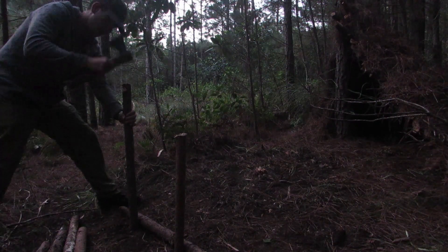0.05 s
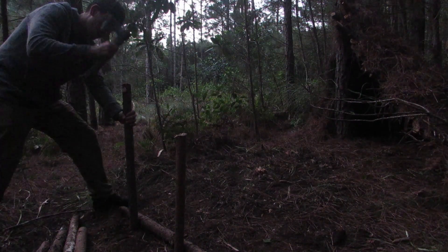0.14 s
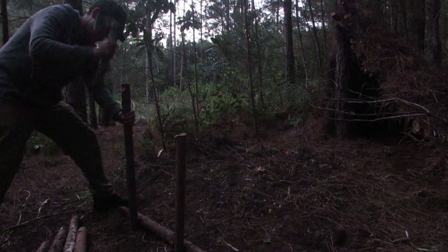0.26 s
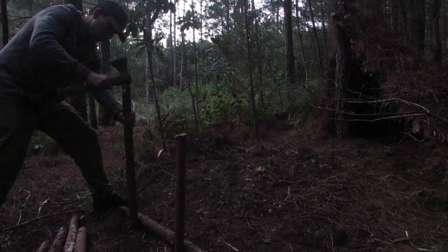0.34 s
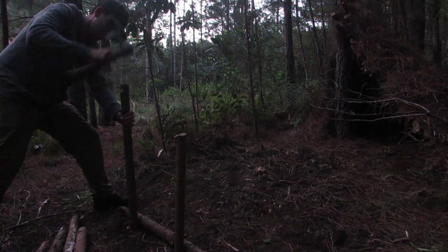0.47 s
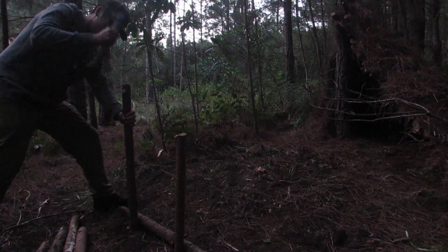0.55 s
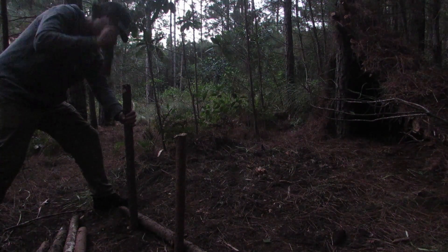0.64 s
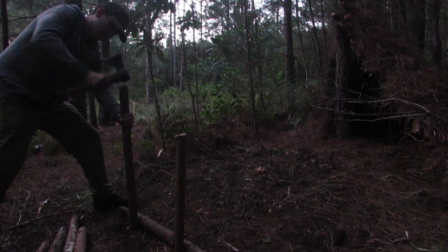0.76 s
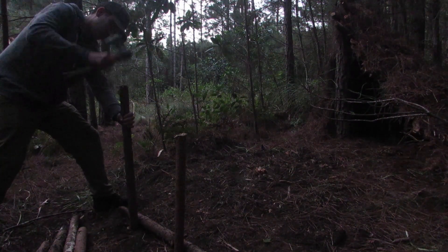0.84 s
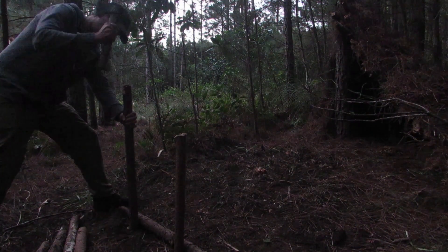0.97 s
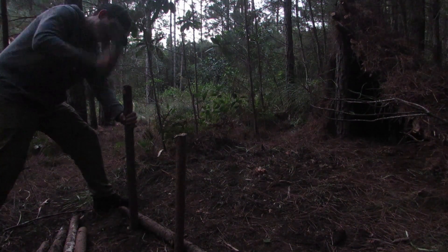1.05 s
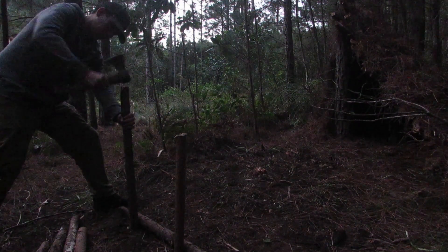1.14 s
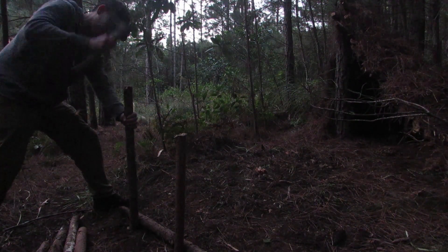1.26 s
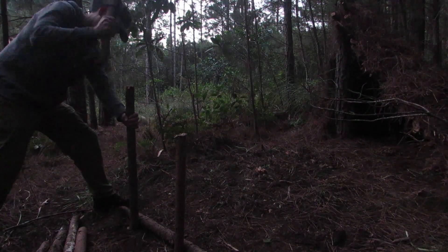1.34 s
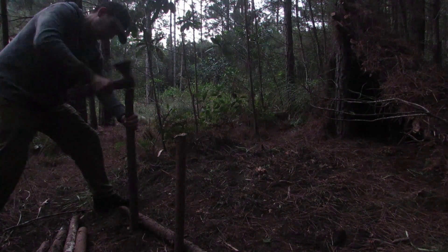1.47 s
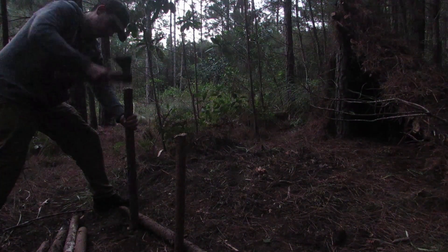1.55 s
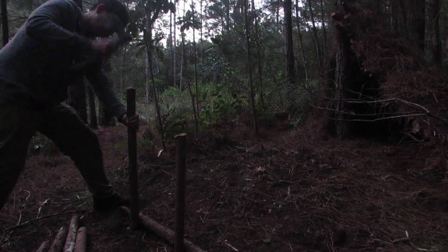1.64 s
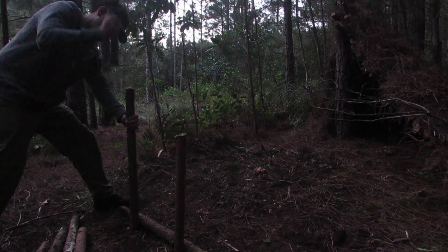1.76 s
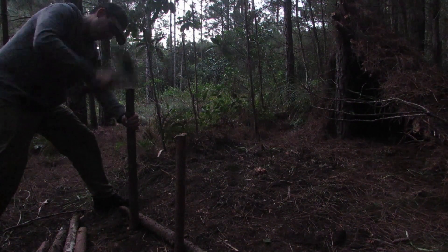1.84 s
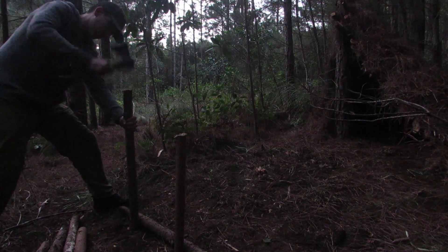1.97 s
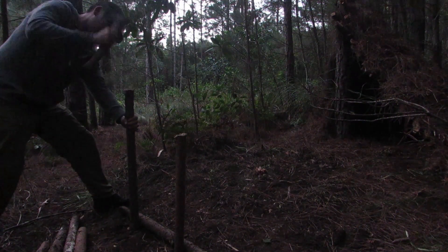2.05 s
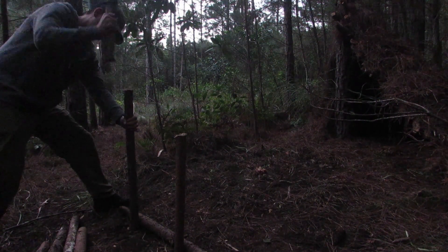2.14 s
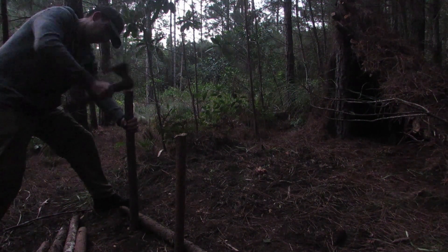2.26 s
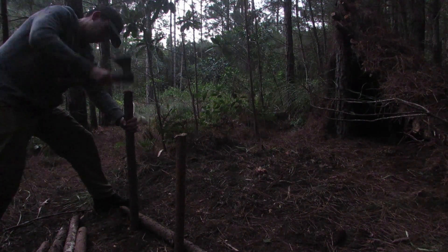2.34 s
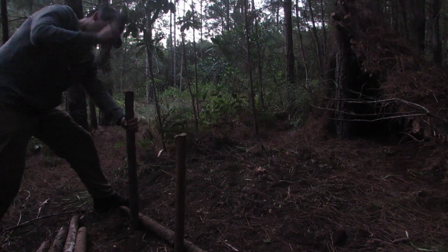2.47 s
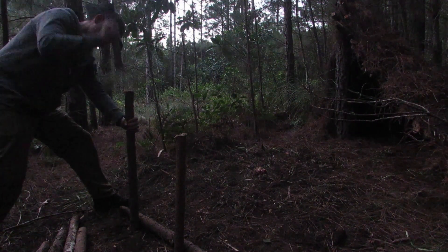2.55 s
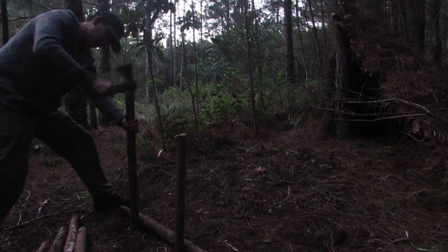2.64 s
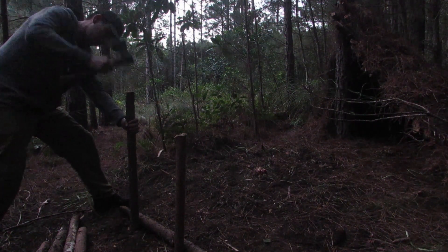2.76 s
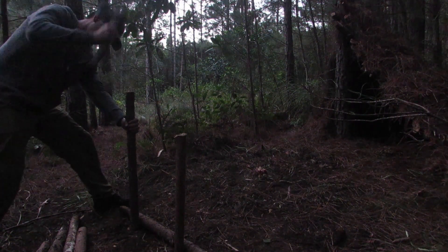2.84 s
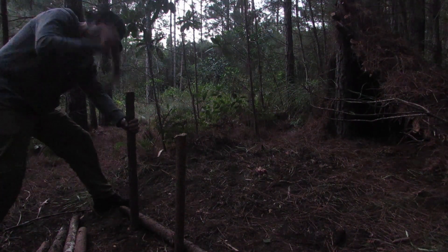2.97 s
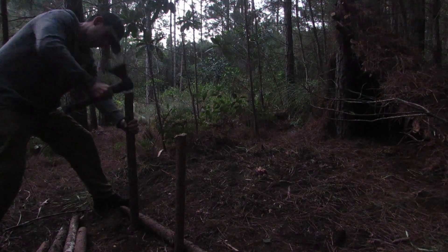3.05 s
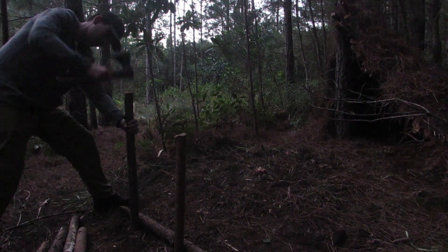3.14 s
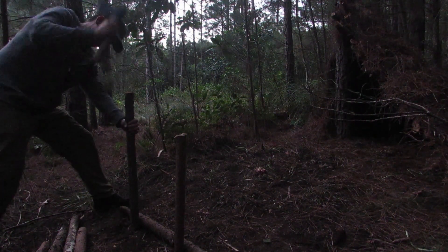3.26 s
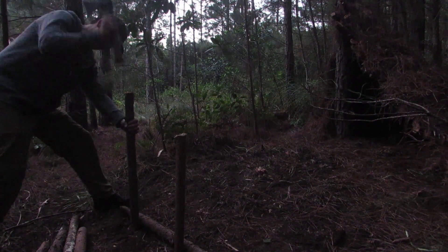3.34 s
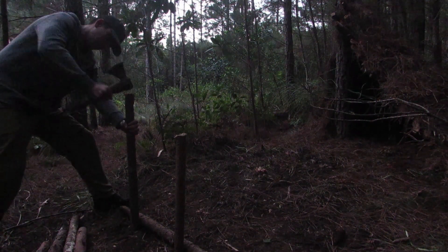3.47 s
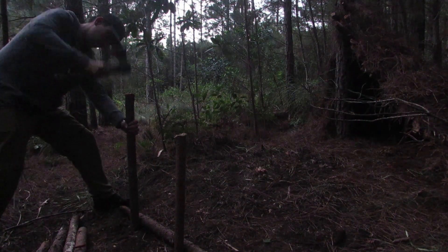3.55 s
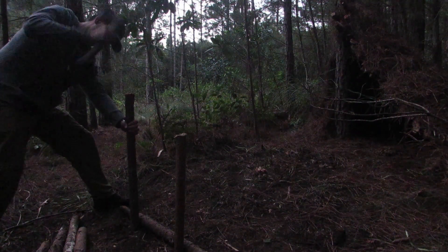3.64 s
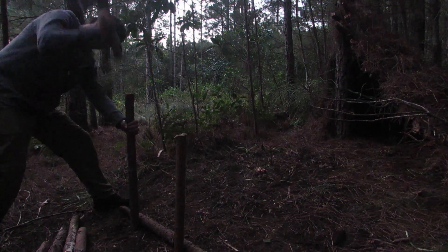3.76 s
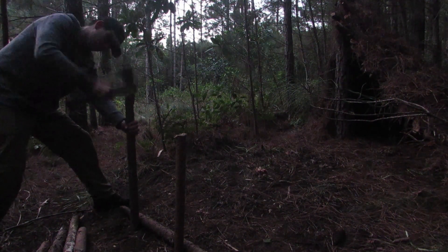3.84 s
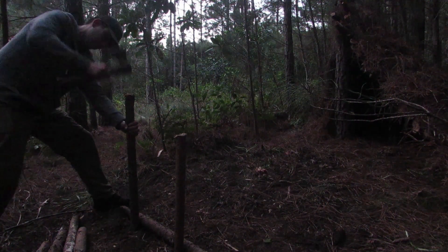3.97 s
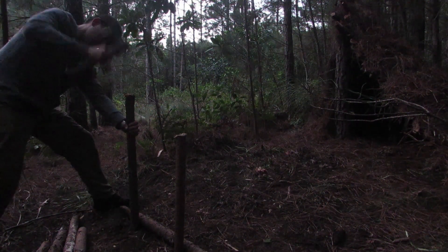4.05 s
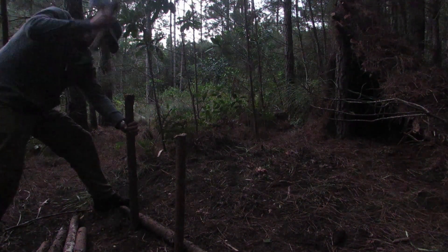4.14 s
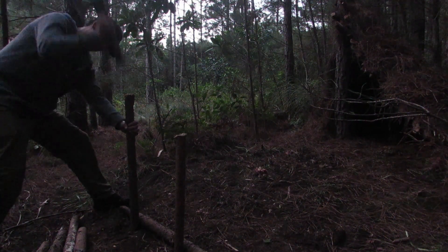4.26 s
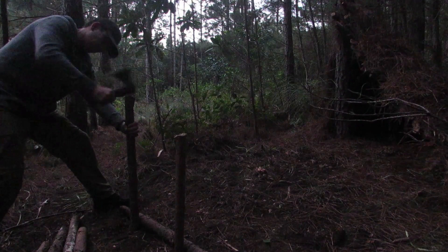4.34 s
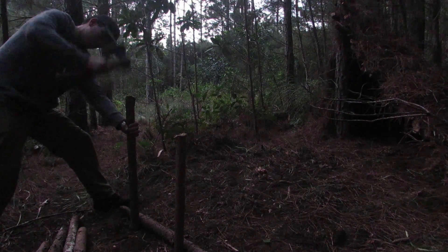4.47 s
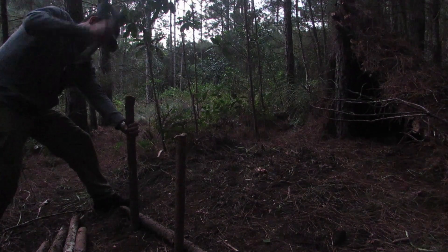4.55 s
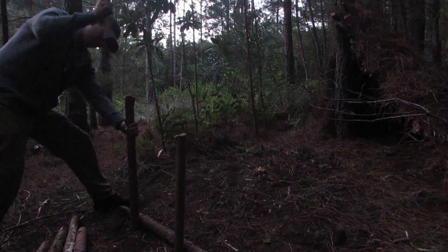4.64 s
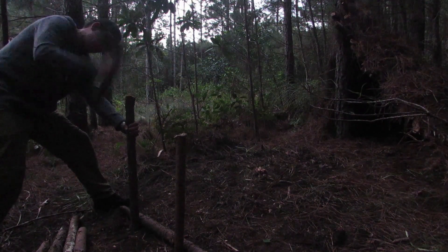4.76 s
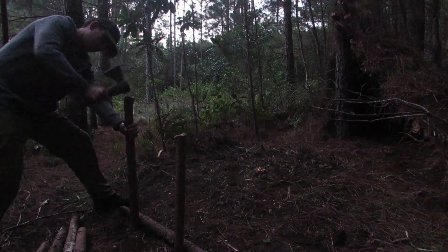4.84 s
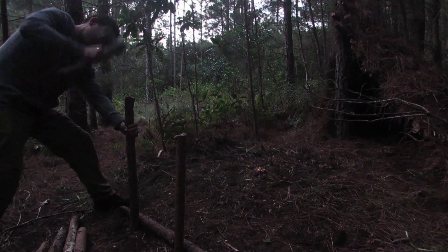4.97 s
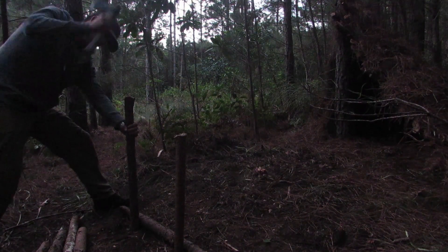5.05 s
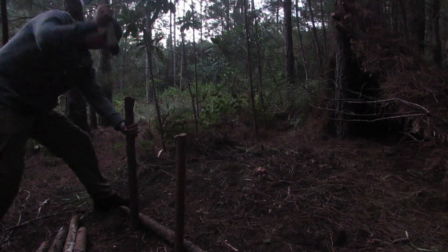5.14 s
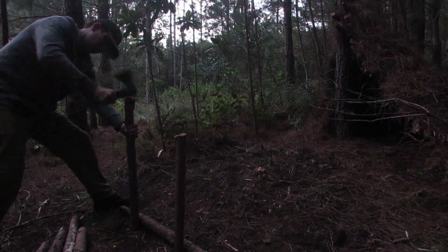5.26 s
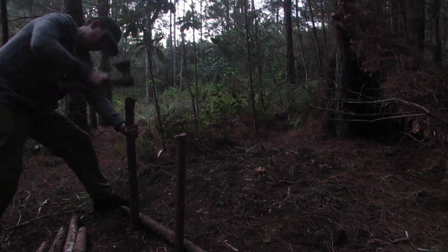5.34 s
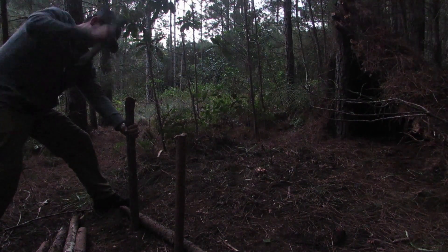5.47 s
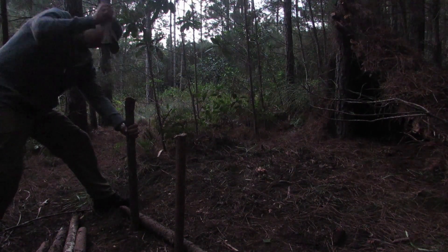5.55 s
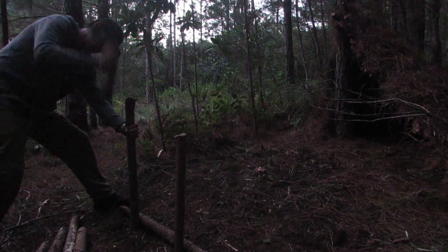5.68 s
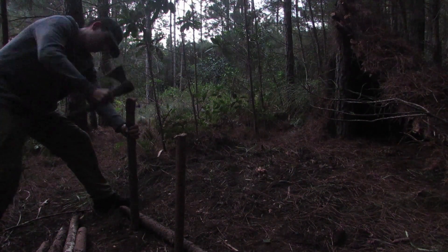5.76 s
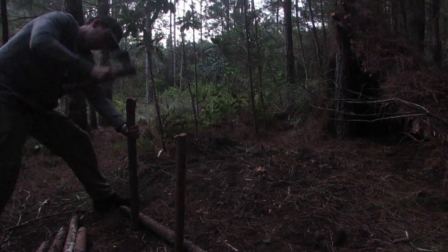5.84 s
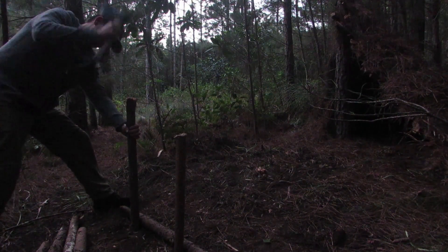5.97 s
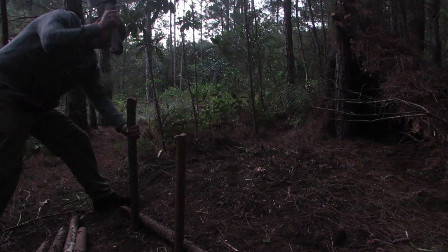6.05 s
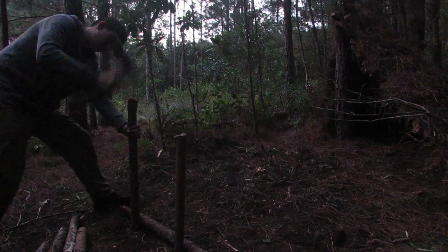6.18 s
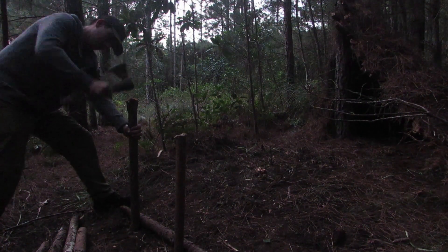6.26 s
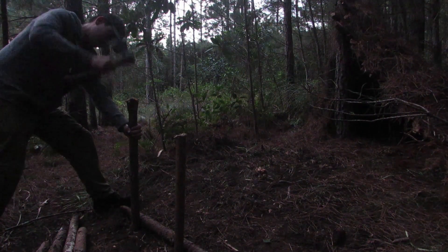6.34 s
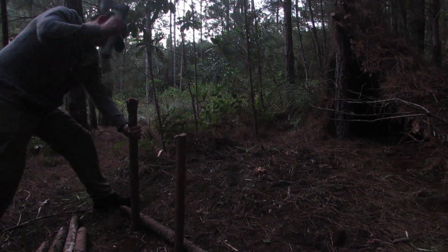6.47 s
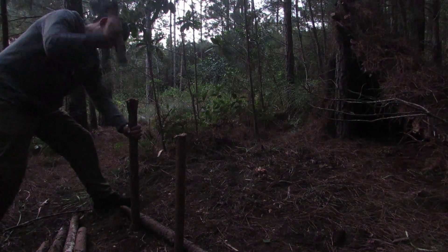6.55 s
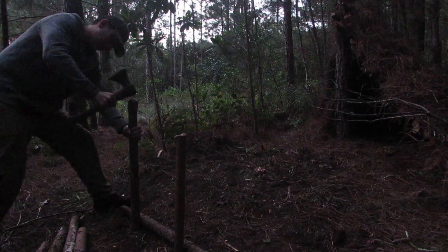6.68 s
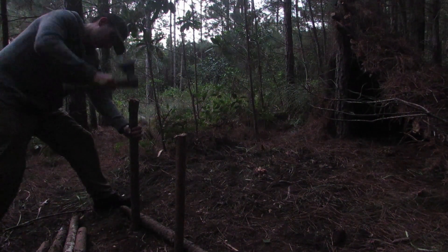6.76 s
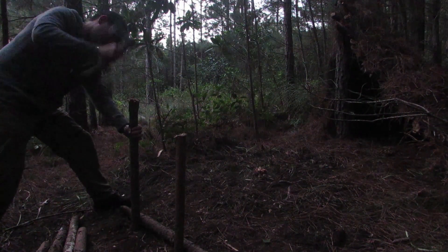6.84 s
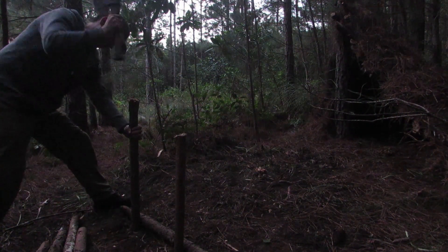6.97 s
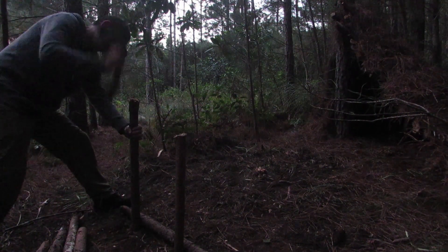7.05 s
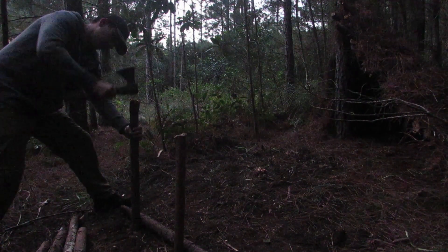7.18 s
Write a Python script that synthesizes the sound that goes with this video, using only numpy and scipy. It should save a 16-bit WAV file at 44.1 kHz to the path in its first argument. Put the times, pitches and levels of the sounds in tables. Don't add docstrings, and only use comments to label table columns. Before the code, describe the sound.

Close by in a quiet forest, a hatchet hammers the top of a wooden stake about two and a half times a second. Each blow is a sharp hollow knock with a crisp crack, a low soil thump and a short scattered echo from the trees. Small bark chips tick between hits. Soft wind, hiss and a far engine drone lie underneath, sinking as the recorder turns itself down.

```python
import sys
import numpy as np
from scipy import signal
from scipy.fft import rfft, irfft, next_fast_len
from scipy.io import wavfile
from scipy.ndimage import uniform_filter1d

SR = 44100
rng = np.random.default_rng(int(sys.argv[2]) if len(sys.argv) > 2 else 0)


def to_linear_factor(level_db):
    exponent = np.asarray(level_db, float) / 20
    return 10 ** exponent


def dump_mix(stems):
    frames = np.atleast_2d(stems).T
    limited = np.clip(frames, -1, 1)
    pcm = np.round(limited * 32767).astype(np.int16)
    wavfile.write(sys.argv[1], SR, pcm)


N = 317961


def evened(x):
    return x / np.sqrt(np.mean(x ** 2) + 1e-20)


def read(points, hz):
    f, value = np.transpose(points)
    return np.interp(np.log(hz + 1), np.log(f + 1), value)


def along(rows):
    s, *columns = np.transpose(rows)
    return [np.interp(np.arange(N) / SR, s, c, right=-140, left=-140) for c in columns]


def add(mix, s, sound):
    part = mix[:, round(s * SR):][:, :sound.shape[-1]]
    part += sound[..., :part.shape[1]]


def slow(size):
    once = uniform_filter1d(rng.standard_normal(N), size)
    return evened(uniform_filter1d(once, size))


def resonate(x, hz, width_hz):
    turn = np.exp(2j * np.pi * np.cumsum(hz * np.ones(len(x))) / SR)
    r = np.exp(-np.pi * width_hz / SR)
    return 2 * (turn * signal.lfilter([1 - r], [1, -r], x / turn)).real


def resonate_twice(x, hz, width_hz):
    return resonate(resonate(x, hz, width_hz), hz, width_hz)


# (frequency [Hz], likeness [0-1])
LIKENESS = [(60, 1.0), (180, 0.91), (550, 0.57), (1650, 0.26), (4970, 0.22), (15000, 1)]
# (frequency [Hz], T60 [s])
NEAR_TRUNK_T60 = [(200, 0.37), (700, 0.085), (2000, 0.16), (5000, 0.16), (15000, 0.52)]
# (frequency [Hz], T60 [s])
FAR_TRUNK_T60 = [(200, .7), (700, 0.88), (2000, 0.82), (5000, .7), (15000, 0.25)]


def noise(colour, count, size, like=0.57, far_db=None):
    top_hz = 15950
    hop = size // 4
    frames, hz = count // hop + 5, np.fft.rfftfreq(size, 1 / SR)
    a, b, c, d = rng.standard_normal((frames, len(hz), 4)).T
    shared, own = a + 1j * b, c + 1j * d
    same = np.clip(read(LIKENESS, hz)[:, None] ** like, 0, 1)
    z = np.array([shared, same * shared + np.sqrt(1 - same ** 2) * own])
    z *= evened(to_linear_factor(read(colour, hz)) * (hz < top_hz))[:, None] / np.sqrt(size / 3)
    if far_db:
        fall_db = -60 * np.arange(frames) * hop / SR
        near = to_linear_factor(fall_db / read(NEAR_TRUNK_T60, hz)[:, None])
        far = to_linear_factor(far_db + fall_db / read(FAR_TRUNK_T60, hz)[:, None])
        z *= near + far
    return signal.istft(z, nperseg=size, noverlap=size - hop)[1][:, :count]


# (time [s], gain [dB])
GAIN = [(0, 2.5), (.4, 0), (.8, -2), (1.2, -6.5), (1.6, -7), (2, -12), (2.6, -15), (3.4, -16.5), (4.5, -18),
        (5.3, -16), (6.3, -12), (7.21, -17.5)]
# (frequency [Hz], level [dB])
AIR = [(25, -30.5), (45, -3.5), (70, 3), (110, 0), (200, -3.5), (265, -7.5), (380, -5), (600, -5),
       (900, -10.5), (1300, -17.5), (1900, -26.5), (3000, -33.5), (5000, -40.5)]


def air(gain_db):
    level_db = -46 + 0.74 * gain_db + 0.8 * slow(size=3000)
    return to_linear_factor(level_db) * evened(noise(AIR, count=N, size=2048))


# (frequency [Hz], level [dB])
HISS = [(1500, -2.5), (3000, -5), (6000, -3), (10000, -5.5), (14000, -7.5), (16300, -16.5)]


def hiss(gain_db):
    return to_linear_factor(gain_db - 65.5) * evened(noise(HISS, count=N, size=512))


def sleeve():
    peak_s, peak_db, rise_db_per_s, fall_db_per_s = 0.15, -58.5, 40, 100
    off = np.arange(SR // 2) / SR - peak_s
    level_db = peak_db + np.minimum(rise_db_per_s * off, -fall_db_per_s * off)
    return to_linear_factor(level_db) * evened(noise(HISS, count=SR // 2, size=256, like=0.7))


# (time [s], level [dB], upper overtone
# [dB])
ENGINE = [(0, -45.5, -2.5), (.55, -47.5, -4), (.8, -50, 8.5), (1.05, -50.5, -0.5), (1.35, -56.5, 2.5),
          (1.75, -53, -1), (2.0, -57, -0.5), (2.55, -51.5, -6), (2.8, -52, 2.5), (3.3, -53.5, -2),
          (3.75, -48, -4), (4.5, -57, 10.5), (5.2, -56.5, -1), (5.5, -51, -7), (6.2, -49.5, -6),
          (6.6, -48, 3), (7.21, -51.5, 6)]
# (frequency [Hz], level [dB])
DRONE = [
    (70.6, -2.5),
    (141.2, 3.5),
    (312, -13),
    (388, -10.5),
]


def engine(gain_db):
    engine_db, load_db = along(ENGINE)
    out = np.zeros(N)
    for hz, db in DRONE:
        turns = np.cumsum(hz * (1 + 0.016 * slow(size=6000))) / SR
        level_db = engine_db + 0.28 * gain_db + db + load_db * (hz > 350) + slow(size=2500)
        out += to_linear_factor(level_db) * np.sin(2 * np.pi * turns)
    return out


def whine(gain_db):
    whine_hz, beat_hz = 15734, 13.5
    t = np.arange(N) / SR
    beat = 1 + 0.5 * np.sin(2 * np.pi * beat_hz * t)
    return to_linear_factor(gain_db - 73) * np.sin(2 * np.pi * whine_hz * t) * beat


def forest():
    gain_db, = along(GAIN)
    out = air(gain_db) + hiss(gain_db)
    add(out, 0, sleeve())
    return out + engine(gain_db) + whine(gain_db)


def tick(bright_db, dull_db, side):
    t60_s, scatter_t60_s, pan_db = 0.006, 0.1, 2
    t = np.arange(2000) / SR
    snap = rng.standard_normal(len(t)) * (to_linear_factor(-60 * t / t60_s) + 0.06 * to_linear_factor(-60 * t / scatter_t60_s))
    bright, dull = (resonate_twice(snap, hz, 0.95 * hz) for hz in (7600, 3300))
    both = to_linear_factor(bright_db) * bright / abs(bright).max()
    both += to_linear_factor(dull_db + 2) * dull / abs(dull).max()
    return to_linear_factor(np.array([[0.5], [-0.5]]) * pan_db * side) * both


# (time [s], bright peak [dB], dull peak [dB])
TICKS = [(0.0981, -44, -76), (0.1794, -45, -63), (0.9394, -53.5, -61), (0.9524, -46, -48),
         (1.0159, -54, -75), (1.2304, -29, -43.5), (1.3829, -50, -73.5), (1.592, -44.5, -41),
         (1.6014, -23, -29.5), (2.8612, -61, -68.5), (3.4093, -59, -79.5), (3.5413, -37.5, -47.5),
         (3.691, -51, -55), (3.7615, -50, -62), (4.34, -60, -64.5), (4.3985, -56.5, -58), (4.599, -56, -43),
         (5.6294, -61, -77.5), (5.709, -43, -44.5), (5.7938, -47.5, -74.5), (5.8994, -64, -68),
         (5.9781, -51, -75), (6.059, -60, -72.5), (6.5999, -54.5, -82), (6.642, -56.5, -72),
         (6.72, -49.5, -64), (6.782, -59, -61), (6.8011, -58, -65), (6.8176, -59.5, -58)]


def add_ticks(mix):
    for s, bright_db, dull_db in TICKS:
        add(mix, s, tick(bright_db, dull_db, side=rng.uniform(-1, 1)))


def knock(t, db, hz, cycles):
    return -to_linear_factor(db) * np.sin(2 * np.pi * hz * t) * np.exp(-(t * hz / cycles) ** 2)


def wood(t, knock_db, hz, head_db, ring_db):
    head_jitter, bright_jitter, ring_jitter = rng.uniform(-1, 1, 3)
    out = knock(t, knock_db, 0.79 * hz, cycles=0.49)
    out += knock(t + 0.0019, head_db + 5, 900 * (1 + 0.1 * head_jitter), cycles=0.2)
    out += knock(t + 0.001, head_db - 6.5, 1700 * (1 + 0.51 * bright_jitter), cycles=1.0)
    spread = 1 + 0.07 * ring_jitter
    late = np.maximum(t - 0.0009, 0)
    for mode_hz, mode_db, t60_s in ((1080, -8, 0.016), (1890, -4, 0.014), (606, -6.5, 0.0073),
                                    (2613, -4.5, 0.012)):
        out += to_linear_factor(ring_db + mode_db - 60 * late / t60_s) * np.sin(2 * np.pi * mode_hz * spread * late)
    return out


def thump(t, thump_db, slowness):
    ms = np.maximum(t, 0) * 1000 / slowness
    swell = (1 - np.exp(-(ms / 2.2) ** 2)) * np.exp(-(ms / 11.5) ** 1.42) * 1.45
    phase = 2 * np.pi * (np.sqrt(ms) - 2.78) / 1.15
    out = to_linear_factor(thump_db) * swell * (np.cos(phase) + 0.2 * np.cos(2 * phase))
    out += knock(t - 0.009, thump_db - 8.5, 92, cycles=0.97)
    rumble = evened(resonate_twice(rng.standard_normal(len(t)), 150, 160))
    out += to_linear_factor(thump_db - 21.5 - 60 * t / 0.16) * rumble * np.clip(t / 0.0053, 0, 1) ** 2
    return out


def bend(low_db, bright_db, bright_hz):
    t = np.arange(600) / SR
    low = knock(t - 0.0035, low_db, 389, cycles=0.94)
    return knock(t - 0.003, bright_db, bright_hz, cycles=3.0) - low


# (frequency [Hz], level [dB per Hz])
CRACK_COLOUR = [(1200, -15), (2500, -4), (4000, -3), (6000, -7.5), (9500, -7.5), (12500, -12.5),
                (15000, -19.5), (16500, -25.5)]
# (frequency [Hz], level [dB])
MIDDLE_TAIL = [(150, -32), (300, -11.5), (600, -0.5), (1200, 0.5), (2200, -4), (3200, -12.5), (5000, -40.5)]
# (frequency [Hz], level [dB])
TREBLE_TAIL = [(1500, -30.5), (3000, 3.5), (5000, 1), (8000, -5), (12000, -11.5), (16000, -11)]


def crack(crack_db, treble_db, middle_db, tilt_db):
    t = np.arange(22000) / SR
    colour = [(hz, db + tilt_db * np.log2(hz)) for hz, db in CRACK_COLOUR]
    fibres = noise(colour, count=2000, size=128, like=0.04)
    u = t[:fibres.shape[1]]
    crush = np.exp(-(u / 0.0019) ** 2) + 0.2 * to_linear_factor(-60 * u / 0.03)
    out = to_linear_factor(treble_db + 6) * noise(TREBLE_TAIL, count=len(t), size=256, like=0.56, far_db=-15.5)
    out += to_linear_factor(middle_db) * noise(MIDDLE_TAIL, count=len(t), size=256, like=0.7, far_db=-14.5)
    out *= np.minimum(t / 0.0013, 1)
    add(out, 0, to_linear_factor(crack_db + 2) * fibres * np.minimum(u / 0.0004, 1) * crush)
    return out


def echo(hz, db):
    t = np.arange(20000) / SR
    band = [(0.7 * hz, -30), (0.88 * hz, -3), (1.12 * hz, -3), (1.4 * hz, -30)]
    tail = noise(band, count=len(t), size=256, like=0.49, far_db=-3.5)
    return to_linear_factor(db) * tail * (1 - np.exp(-(t / 0.028) ** 2))


# (time [s], slowness [ratio], thump [dB], ring [dB], low bend [dB])
SOIL = [(.4, 1.3, -16, -6, -12.5), (1.1, 1.05, -22, -15.5, -16), (1.9, 1.09, -23, -20.5, -8),
        (3.0, 0.95, -19, -17, -12), (4.4, 0.97, -16.5, -24, -16), (5.3, 0.97, -11.5, -23.5, -16.5),
        (7.2, 0.87, -11.5, -17.5, -10.5)]


def add_blow(mix, s, knock_db, hz, head_db, bright_hz, crack_db, tilt_db, treble_db, bright_db, echo_hz):
    when, *depth = np.transpose(SOIL)
    slowness, thump_db, ring_db, low_db = (np.interp(s, when, c) for c in depth)
    sunk_db = 0.29 * np.interp(s, *np.transpose(GAIN))
    crack_s = s - 0.0024
    t = np.arange(-200, 6600) / SR
    add(mix, s - 200 / SR, wood(t, knock_db, hz, head_db, ring_db) + thump(t, thump_db, slowness))
    add(mix, s - 0.003153, bend(low_db, bright_db, bright_hz))
    add(mix, crack_s, crack(crack_db, treble_db, sunk_db - 35.5, tilt_db))
    add(mix, crack_s, echo(echo_hz, sunk_db - 20.5 + 0.55 * treble_db))


# (time [s], knock peak [dB], knock [Hz], head knock [dB], bright bend [Hz])
BLOWS = [(0.3956, 2, 1140, -8.5, 1658), (0.7728, -7, 1550, -5.5, 1650), (1.143, 0.5, 1436, -8.5, 1594),
         (1.5192, -1, 1390, -5.5, 1633), (1.9111, 4, 1200, 0, 1618), (2.307, -1, 1150, -6.5, 2097),
         (2.6934, -0.5, 1160, -10, 1930), (3.0912, -0.5, 1290, -12, 1980), (3.49, -9, 1380, -13.5, 1630),
         (3.908, -4.5, 1220, -21.5, 1710), (4.3546, -1.5, 1460, -12.5, 1623),
         (4.811, -7.5, 1167, -16.5, 1650), (5.2723, -7.5, 1220, -21, 1640), (5.743, -1.5, 1310, -9, 1890),
         (6.219, -13, 1250, -13, 1937), (6.6722, 0, 1530, -8.5, 1735), (7.1221, -2, 1236, -9.5, 2190)]
# (crack [dB], tilt [dB per octave], splinter tail [dB], bright bend [dB], echo [Hz])
CONTACT = [(-22, 1, -48, -15, 1500), (-18, 7.5, -48, -13.5, 2220), (-12, 1, -51, -20, 1600),
           (-14, -3, -46.5, -15.5, 1700), (-17, -2, -58.5, -23, 1320), (-16.5, -8, -56.5, -9.5, 2270),
           (-21.5, -4.5, -57, -15.5, 1120), (-15.5, -4.5, -55.5, -14, 2000), (-24, 1, -53.5, -20, 2030),
           (-14, -8.5, -53.5, -17.5, 1850), (-22, -0.5, -56, -13.5, 1600), (-21, -4.5, -54.5, -19, 1650),
           (-21.5, -3, -54.5, -22.5, 1300), (-26, -1.5, -59, -35.5, 1140), (-21, -0.5, -51, -14, 1940),
           (-24.5, 0.5, -57, -13.5, 1400), (-23.5, -4.5, -58.5, -28, 1070)]


def add_blows(mix):
    for stroke, contact in zip(BLOWS, CONTACT):
        add_blow(mix, *stroke, *contact)


def ducking():
    since = np.arange(N) / SR - np.transpose(BLOWS)[0][:, None]
    return -5.0 * np.where(since > 0, np.exp(-abs(since) / 0.19), 0).max(0)


# (frequency [Hz], difference [dB])
PORT_DB = [(60, -0.1), (170, -.3), (320, -0.9), (600, -.6), (1200, 1), (4000, .6), (8000, 0.5),
           (13000, -1.5)]
# (frequency [Hz], lead [rad])
PORT_LEAD = [(60, .01), (250, .08), (550, .19), (1200, 0.16), (2500, .15), (5000, 0.2), (9000, 0.76),
             (14000, 1)]


def ports(x):
    size = next_fast_len(N)
    hz = np.fft.rfftfreq(size, 1 / SR)
    half = to_linear_factor(read(PORT_DB, hz) / 2) * np.exp(0.5j * read(PORT_LEAD, hz))
    return irfft(rfft(x, size) * np.array([half, 1 / half]), size)[:, :N]


# (time [s], pitch [Hz], level [dB])
BIRD = [
    (4.13, 7400, -85),
    (4.16, 7300, -81),
    (4.19, 6730, -82),
    (4.23, 6580, -77.5),
    (4.26, 6850, -76),
    (4.30, 6850, -82.5),
    (4.345, 6870, -74),
]


def bird():
    hz, db = along(BIRD)
    upper_breath, lower_breath = rng.standard_normal((N, 2)).T
    upper = evened(resonate_twice(upper_breath, abs(hz), 260))
    lower = evened(resonate_twice(lower_breath, 6300, 260))
    return to_linear_factor(db - 3) * (upper + 0.9 * lower * (np.arange(N) > 4.165 * SR))


def scene():
    near = np.zeros((2, N))
    add_blows(near)
    add_ticks(near)
    return ports(near) + forest() * to_linear_factor(ducking()) + bird()


def top_cut(x):
    return signal.sosfilt(signal.butter(12, 16830, fs=SR, output="sos"), x)


def record(dry):
    bass_hz, ceiling = 58, 0.97
    heard = signal.sosfilt(signal.butter(2, bass_hz, "high", fs=SR, output="sos"), dry)
    return top_cut(np.clip(heard, -ceiling, ceiling))


dry = scene()
out = record(dry)
dump_mix(out)
```